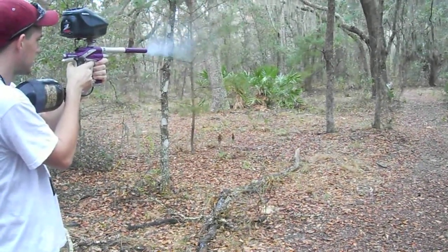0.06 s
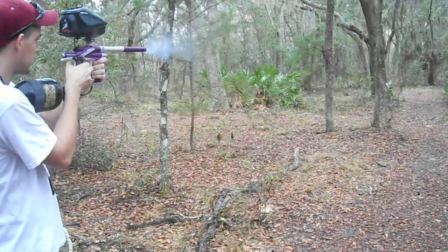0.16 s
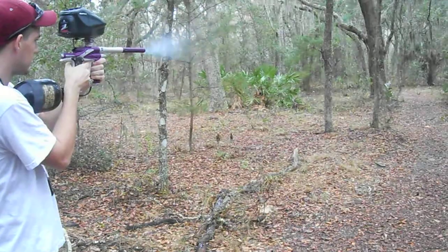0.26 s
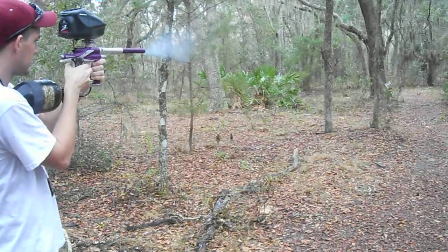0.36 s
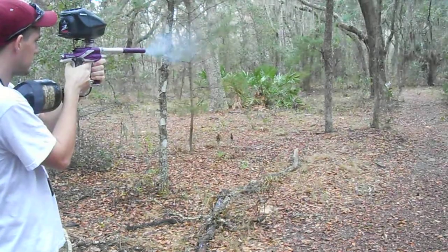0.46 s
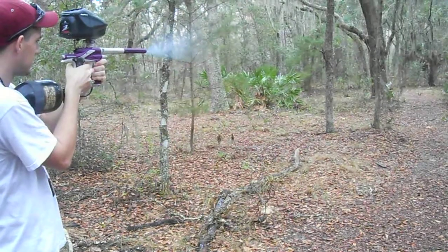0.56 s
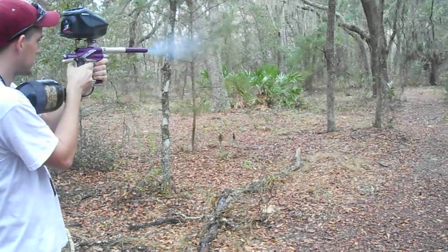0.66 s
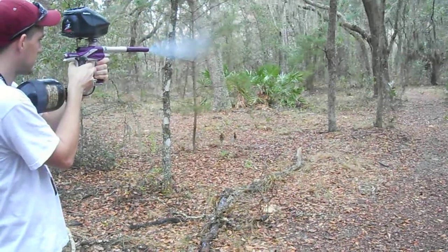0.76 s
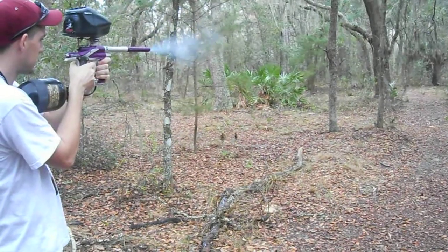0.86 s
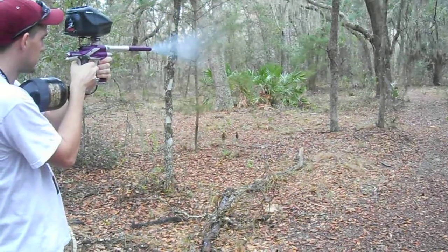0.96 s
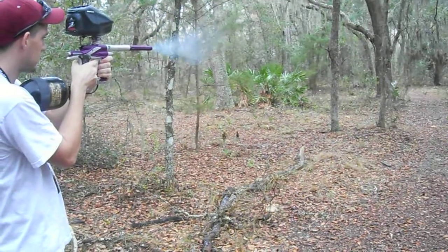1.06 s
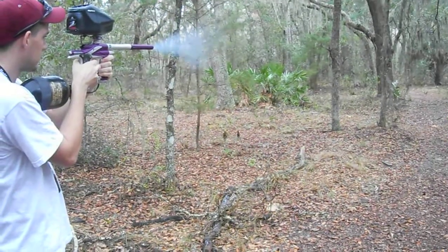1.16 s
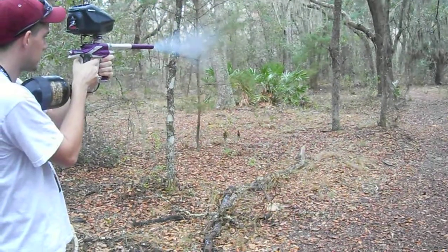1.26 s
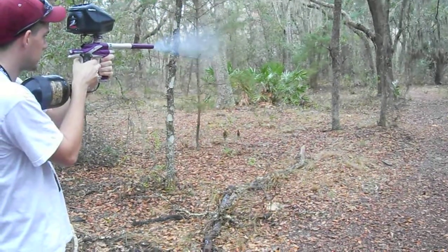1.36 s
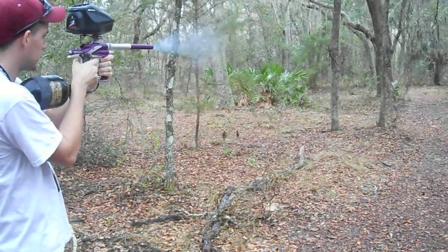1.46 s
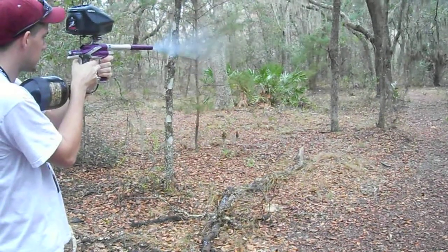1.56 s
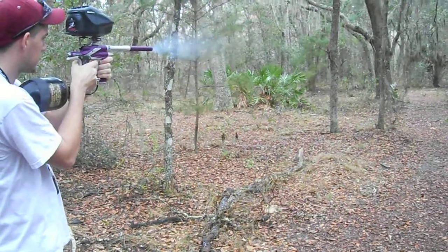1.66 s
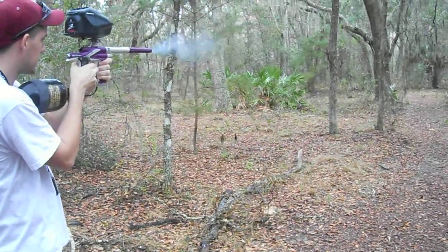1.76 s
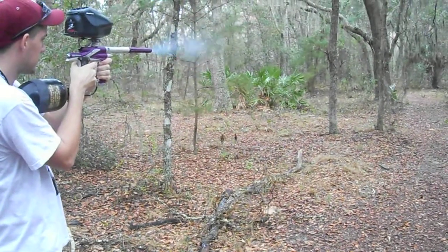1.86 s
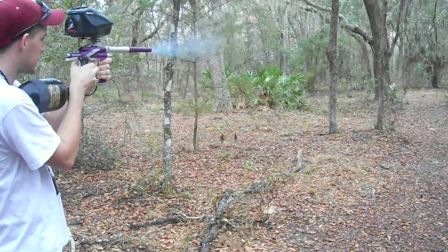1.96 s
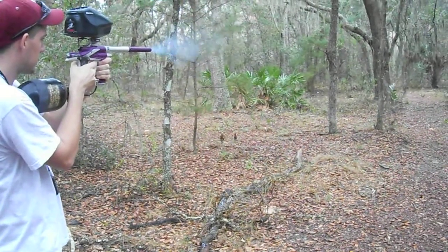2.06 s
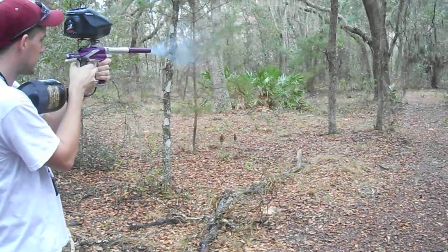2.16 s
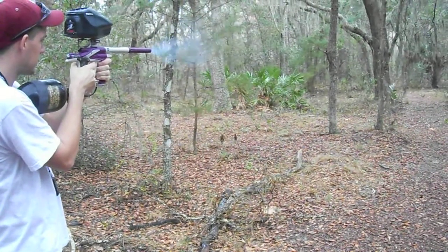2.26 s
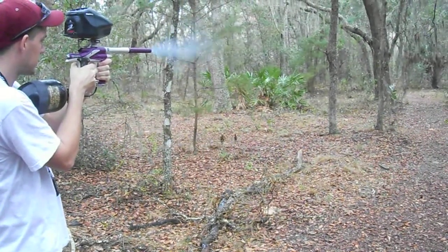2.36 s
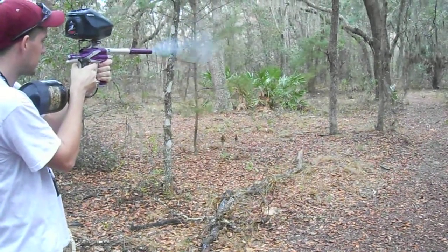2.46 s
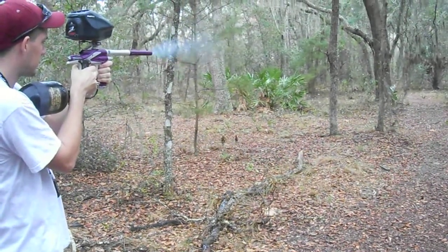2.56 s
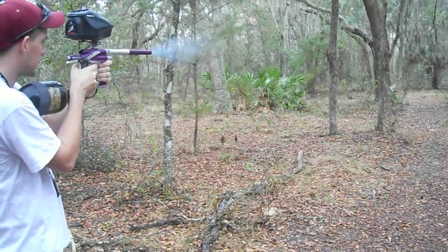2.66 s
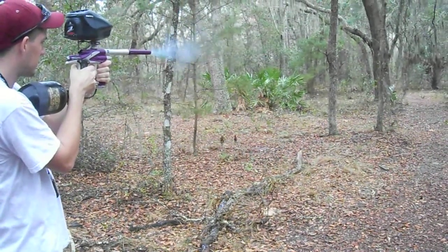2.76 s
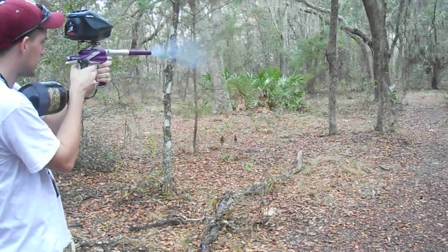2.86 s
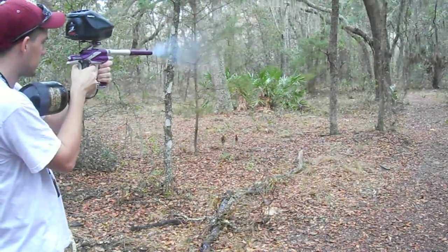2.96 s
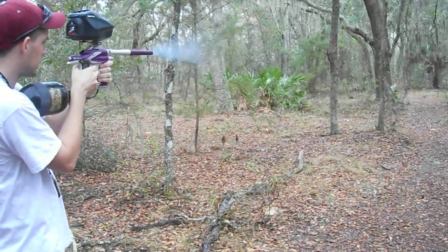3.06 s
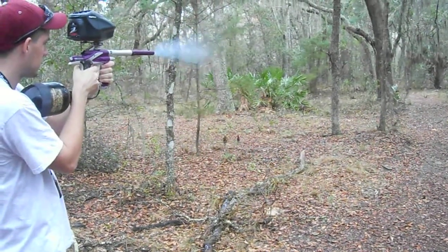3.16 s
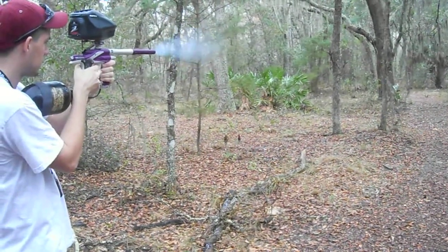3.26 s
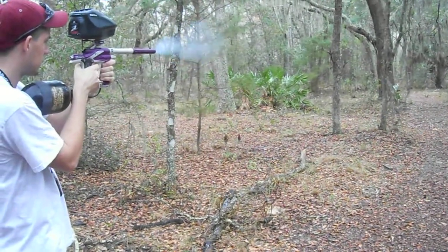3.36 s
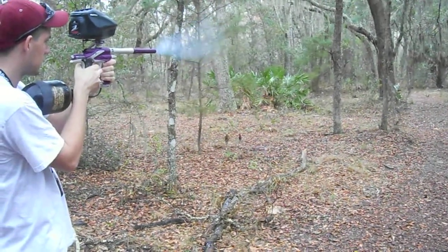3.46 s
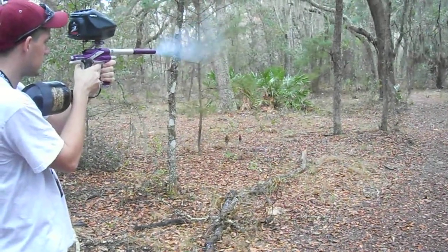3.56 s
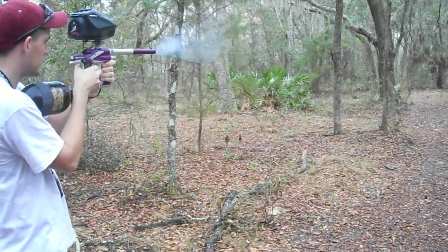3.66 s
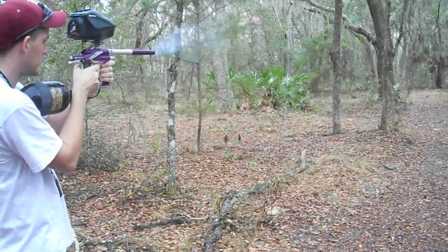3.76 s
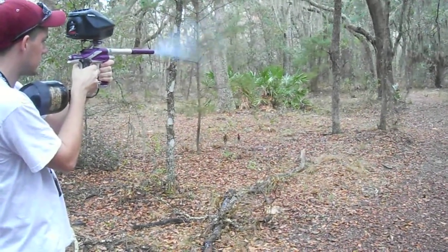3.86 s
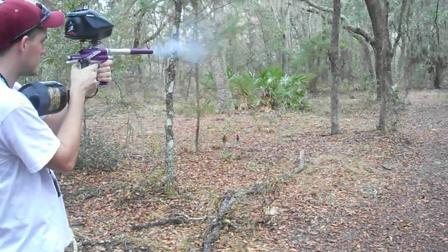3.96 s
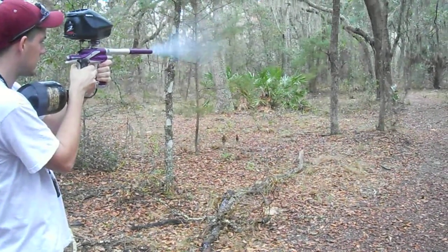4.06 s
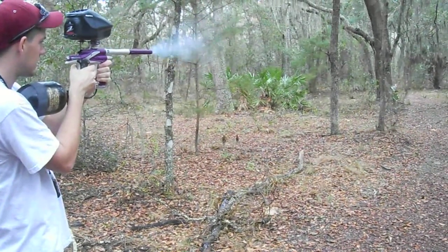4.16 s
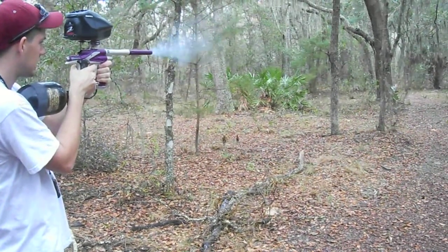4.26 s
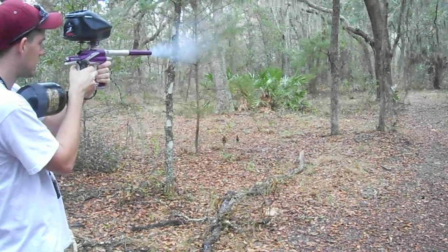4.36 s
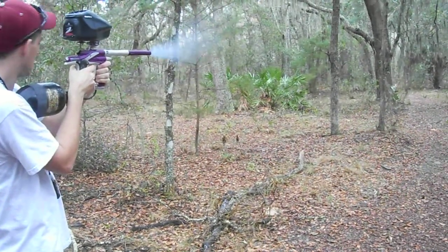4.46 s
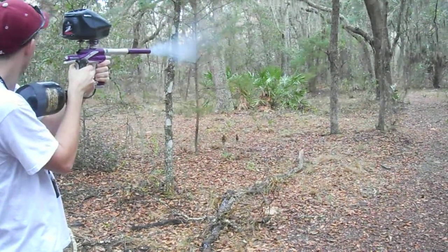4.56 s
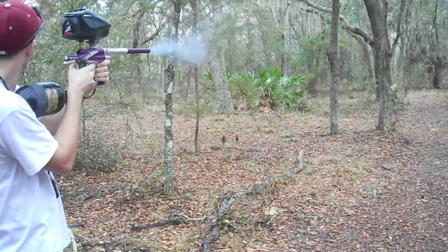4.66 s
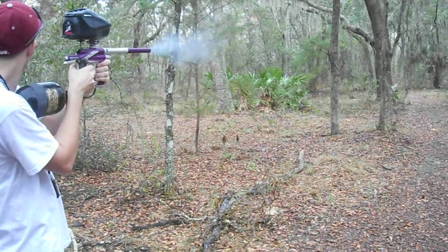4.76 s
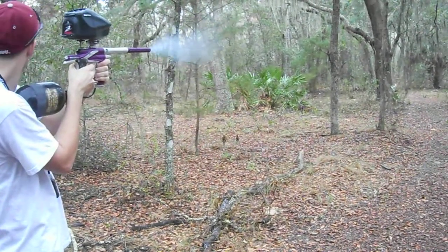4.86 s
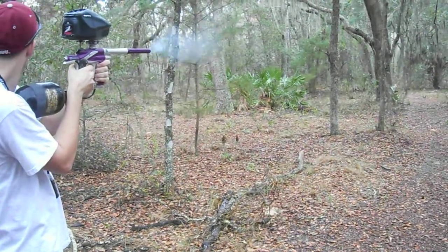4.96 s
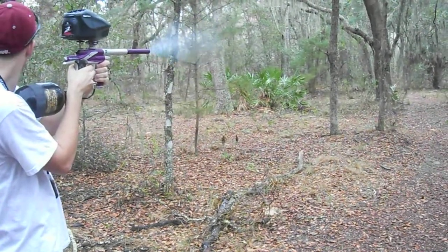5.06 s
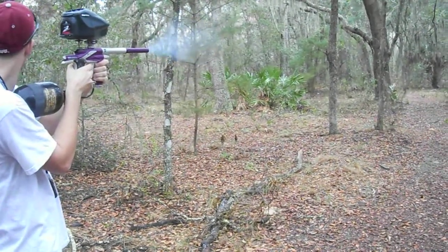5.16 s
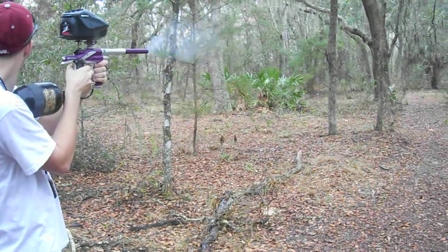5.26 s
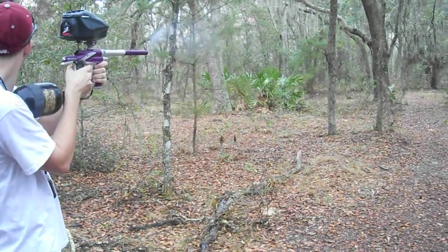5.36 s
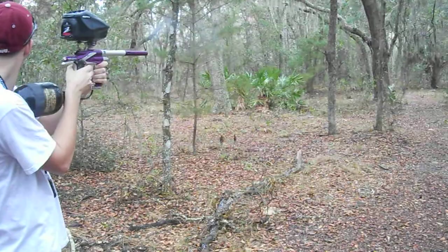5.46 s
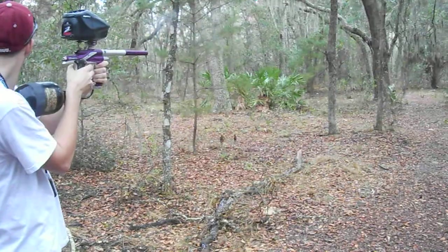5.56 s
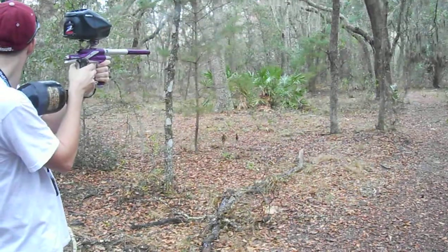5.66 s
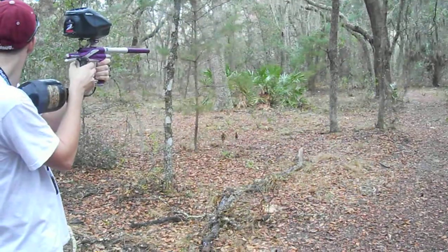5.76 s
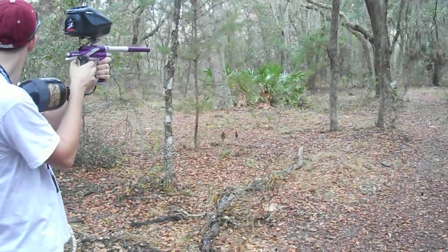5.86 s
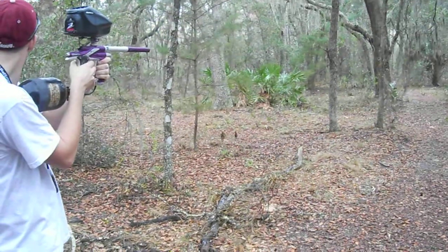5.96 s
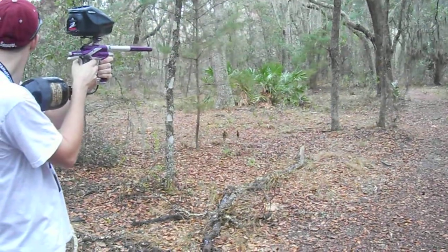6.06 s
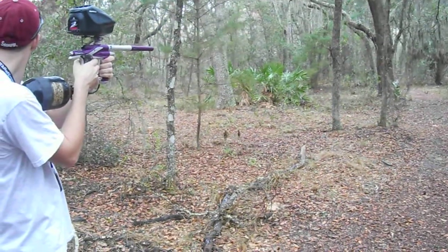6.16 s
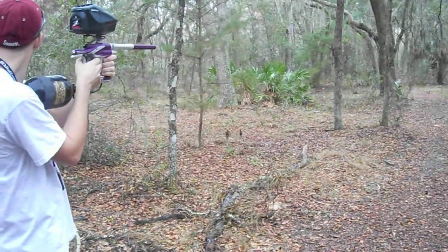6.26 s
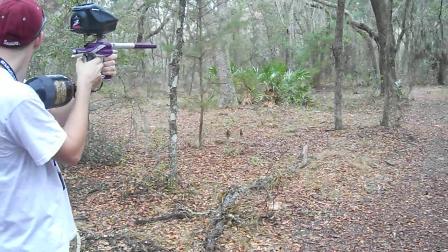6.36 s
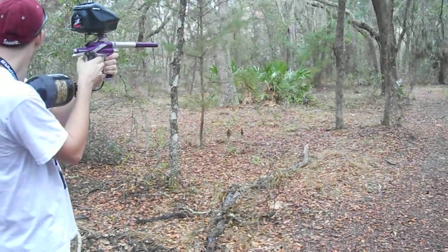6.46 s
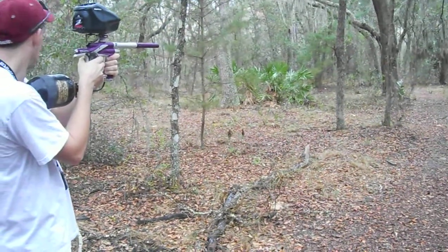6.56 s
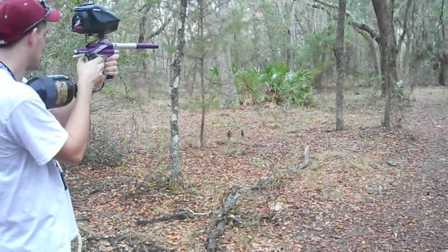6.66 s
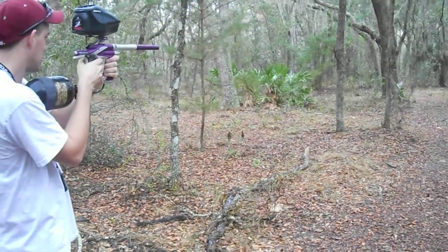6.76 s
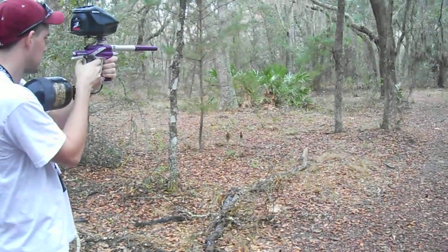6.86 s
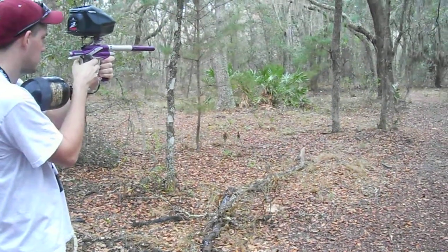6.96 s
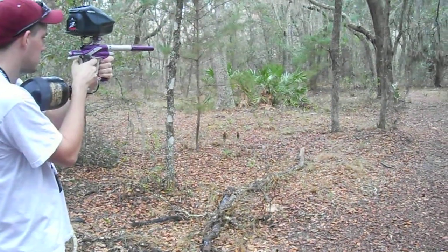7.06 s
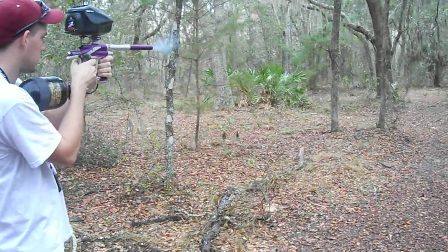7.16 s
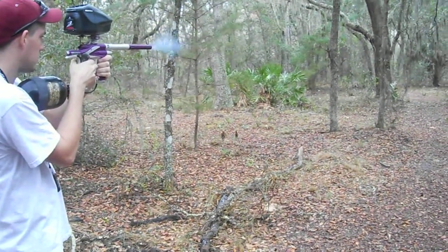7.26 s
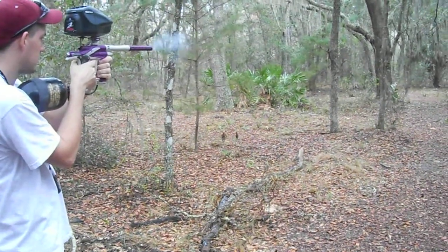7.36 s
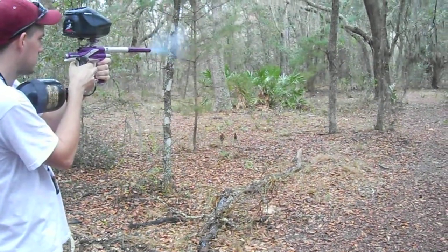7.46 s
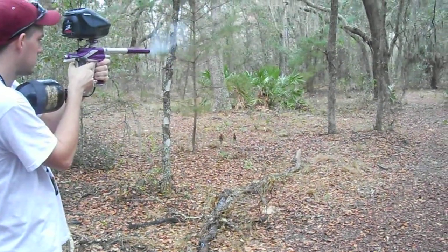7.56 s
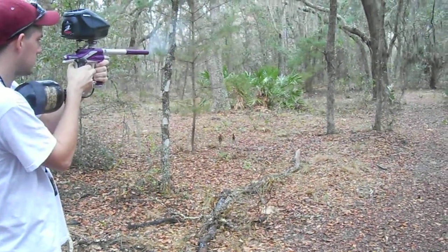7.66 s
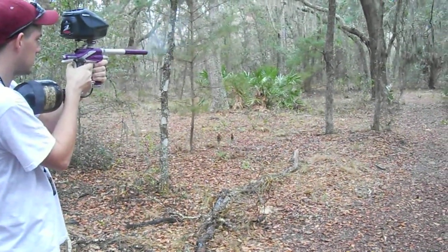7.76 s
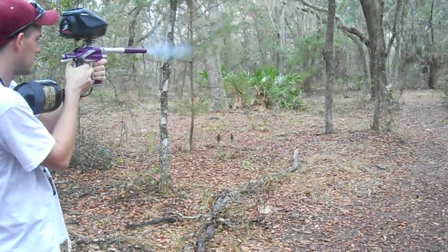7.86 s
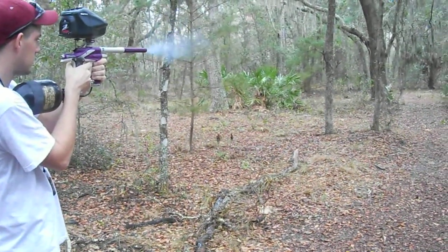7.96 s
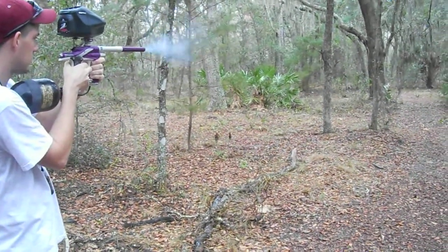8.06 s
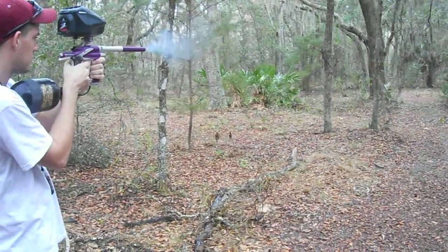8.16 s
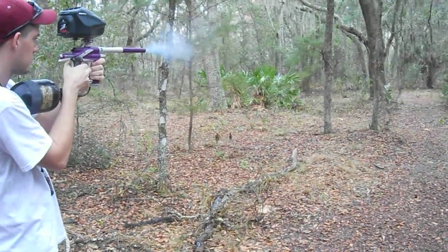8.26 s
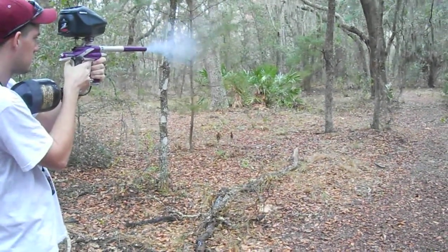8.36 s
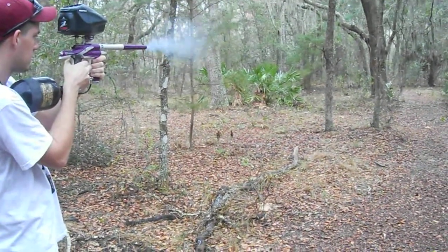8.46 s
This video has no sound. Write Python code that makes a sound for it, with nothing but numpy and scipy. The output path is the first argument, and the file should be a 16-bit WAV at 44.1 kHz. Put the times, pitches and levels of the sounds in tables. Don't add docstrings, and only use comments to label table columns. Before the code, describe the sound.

Rapid-fire compressed-air pops with metallic bolt clacks and hissing air, broken by short gaps and three spaced shots, echo briefly among trees.

```python
import sys
import numpy as np
from scipy import signal
from scipy.fft import rfft, irfft, next_fast_len
from scipy.io import wavfile
from scipy.ndimage import map_coordinates

SR = 44100
rng = np.random.default_rng(int(sys.argv[2]) if len(sys.argv) > 2 else 0)


def store_wav(level_fs):
    pcm = np.round(np.clip(np.atleast_2d(level_fs), -1, 1) * 32767)
    wavfile.write(sys.argv[1], SR, pcm.T.astype(np.int16))


def volts(x):
    e = np.asarray(x, float) / 20
    return 10 ** e


N = 375732


def unit(x):
    return x / np.sqrt(np.mean(x ** 2) + 1e-20)


def along(points, hz):
    f, v = np.transpose(points)
    return np.interp(np.log(hz + 1), np.log(f + 1), v)


def filtered(x, response):
    m = next_fast_len(len(x) + 4096)
    return irfft(rfft(x, m) * response(np.fft.rfftfreq(m, 1 / SR)), m)[:len(x)]


def modes(table):
    def response(f):
        total = 0
        for k, (centre, width, db) in enumerate(table):
            damping = 1j * f * width
            total = total + (-1) ** k * volts(db) * damping / (centre * centre - f * f + damping + 1)
        return total
    return response


def wobble(rate):
    return map_coordinates(rng.standard_normal(int(N * rate / SR) + 4), [np.arange(N) * rate / SR])


def noise(spectrum):
    return unit(filtered(rng.standard_normal(N), lambda f: volts(along(spectrum, f))))


def add(track, s, piece):
    at = round(s * SR)
    part, piece = track[max(at, 0):], piece[max(-at, 0):]
    part[:len(piece)] += piece[:len(part)]


def burst(t60, rise=.0002, length=.03):
    t = np.arange(round(length * SR)) / SR
    return rng.standard_normal(len(t)) * volts(-60 * t / t60) * (1 - np.exp(-t / rise))


def strike(t60, grit, length=.03):
    blow = grit * burst(t60, length=length)
    blow[0] += 1
    return blow


def overload(x, top, hardness):
    return x / (1 + np.abs(x / top) ** hardness) ** (1 / hardness)


# (time [s], shots, bolt delay of first shot [ms], bolt delay of later shots [ms])
STRINGS = [
    (-.44262, 36, 22, 25.2),
    (2.5157, 15, 22.4, 24.9),
    (3.7913, 14, 22.7, 25),
    (4.9841, 3, 21.6, 24.3),
    (7.0854, 1, 15.1, 0),
    (7.2371, 1, 18.7, 0),
    (7.4366, 1, 18.5, 0),
    (7.7616, 10, 17.9, 22.4),
]
START_DB = [-13.5, -14, -13, -15.1, -11.5, -12.6, -13, -14.3]
SAG_DB_PER_S = [0.43, 0.27, 2.7, .3, 0, 0, 0, 0]


def firing():
    cycle_s, first_early_s = .080537, .0002
    mean_tick_db, mean_bolt_db, mean_echo_db = -21.5, -0.8, -19.5
    scatter = [.55, .6, .55, .9, .45]
    rows = []
    for (start, shots, first_ms, later_ms), start_db, sag in zip(STRINGS, START_DB, SAG_DB_PER_S):
        k = np.arange(shots)
        pop_luck, tick, late, bolt, echo = (rng.standard_normal((shots, 5)) * scatter).T
        times = start + k * cycle_s - (k > 0) * first_early_s
        pop_db = start_db - sag * k * cycle_s + pop_luck
        bolt_ms = np.where(k > 0, later_ms + late, first_ms)
        rows += zip(times, pop_db, mean_tick_db + tick - pop_luck, bolt_ms,
                    mean_bolt_db + bolt - pop_luck, mean_echo_db + echo - pop_luck / 2)
    return np.array(rows)


# (frequency [Hz], width [Hz], level [dB])
VALVE = [(834, 84, 3.5), (2640, 530, -12.5), (3800, 1900, -19), (8040, 8800, -21)]


def valve_ticks(shots):
    valve, tick = np.zeros(N), strike(0.021, 1.0)
    for s, db, tick_db, *_ in shots:
        add(valve, s - .0112, volts(db + tick_db + 25) * (tick + 0.031 * burst(0.0098)))
    return filtered(valve, modes(VALVE))


# (delay [ms], level [dB], dulled above [Hz])
ARRIVALS = [
    (.27, 2, 2100),
    (1.45, 1.5, 3150),
    (2.0, -7, 21600),
    (2.9, -13.5, 13000),
    (4.65, 1, 2960),
    (5.3, 8.5, 940),
    (7.05, 1, 1220),
    (9.75, -2, 720),
    (10.5, 5, 1020),
    (12.9, -5, 750),
]
PUSH = [-1, -1, 1, 1, -1, 1, -1, -1, 1, -1]
# (frequency [Hz], width [Hz], level [dB])
BARREL = [(184, 1440, -2.65), (534, 87, -8.5), (867, 60, -13), (1516, 290, 0.5), (1705, 140, -28),
          (2434, 216, 1.5), (3390, 180, -5), (3780, 230, -6.5)]


def muzzle_pops(shots):
    def paths(f):
        total = 0
        for push, (ms, db, dull_hz) in zip(PUSH, ARRIVALS):
            delay = np.exp(-2j * np.pi * f * ms / 1000)
            total = total + push * volts(db) * delay / (1 + 1j * f / dull_hz) ** 2
        return total

    pops, barrel = np.zeros(N), modes(BARREL)
    impulse = np.eye(1, 1200)[0]
    front = unit(filtered(impulse, lambda f: paths(f) * barrel(f)))
    for s, db, *_ in shots:
        add(pops, s, volts(db - 5.5) * front)
    return pops


# (delay [ms], level [dB], t60 [ms])
JETS = [
    (.4, 3, 7.5),
    (2.3, -2, 8.5),
    (4.9, 1.5, 9.4),
    (9.8, -7, 8),
]
# (frequency [Hz], density [dB per Hz])
JET = [(900, -9.5), (1500, 5), (3000, -5.5), (4000, 1), (5500, -6), (7500, 0), (9000, 1.5), (11500, -5.5),
       (14000, 1.5)]


def air_jets(shots):
    jets = np.zeros(N)
    habit = [burst(t60_ms / 1000, rise=0.000092) for _, _, t60_ms in JETS]
    for s, db, *_ in shots:
        for (ms, jet_db, t60_ms), usual in zip(JETS, habit):
            level = volts(db + jet_db + rng.normal(0, 0.98) + 7.0)
            fresh = burst(t60_ms / 1000, rise=0.00031)
            add(jets, s + ms / 1000, level * (0.75 * usual + 0.97 * fresh))
    return filtered(jets, lambda f: volts(along([(200, -56)] + JET, f)))


# (frequency [Hz], width [Hz], level [dB])
BOLT = [(940, 167, 1), (2670, 150, -9), (4600, 1040, -13.5), (7290, 720, -2), (11100, 2600, -9)]


def bolt_slams(shots):
    bolt, slam = np.zeros(N), burst(0.0074, rise=0.00024)
    for s, db, _, late_ms, bolt_db, _ in shots:
        rattle = 1.45 * burst(0.0072, rise=0.00017)
        tail = volts(-18.0) * burst(0.079)
        add(bolt, s + late_ms / 1000, volts(db + bolt_db + 13.5) * (0.69 * slam + rattle + tail))
    return filtered(bolt, modes(BOLT))


# (frequency [Hz], t60 [s])
TREES = [(150, 0.41), (500, 0.31), (1000, 0.32), (3000, 0.32), (10000, 0.27)]
# (frequency [Hz], density [dB per Hz])
FOLIAGE = [(100, -46), (300, 0.5), (550, 2), (900, 0), (1600, -3.5), (3000, -15.5), (3700, -7.5),
           (4600, -13.5), (6000, -12.5), (9000, -11.5)]


def trees(shots):
    out = np.zeros(N)
    hz, t = np.fft.rfftfreq(256, 1 / SR)[:, None], np.arange(120) * 128 / SR

    def chance():
        return (rng.standard_normal((len(hz), len(t), 2)) @ [1, 1j]) / 18

    near = volts(-8.5 - 60 * t / 0.19)
    far = volts(-60 * t / along(TREES, hz))
    colour = volts(along(FOLIAGE, hz))
    steady, same = 1 / (1 + (hz / 2500) ** 2), chance()
    for s, db, *_, echo_db in shots:
        new = chance()
        nearest = steady * same + np.sqrt(1 - steady ** 2) * new
        field = (near * nearest + far * new) * colour
        add(out, s + .009, volts(db + echo_db + 15.5) * signal.istft(field, SR, nperseg=256)[1])
    return out


# (frequency [Hz], density [dB per Hz])
ROAD = [(120, -36), (200, -12.5), (369, -6), (409, -4.5), (448, -9.5), (482, -6), (641, -10), (717, -1),
        (1020, 0.5), (1370, -6), (2300, -21.5), (2990, -38), (5060, -120)]
# (frequency [Hz], density [dB per Hz])
RUMBLE = [(12, -33), (20, 10.5), (65, 5), (108, -4), (182, -7), (220, -31), (290, -32), (480, -120)]
# (frequency [Hz], density [dB per Hz])
HISS = [(1200, -46), (2200, 0), (4000, -1.5), (8000, -5), (12500, -4.5)]


def background():
    road_db, rumble_db, hiss_db = -53, -53.5, -64
    lumps = volts(.5 * wobble(9) + .7 * wobble(30))
    gusts = volts(1.2 * wobble(6))
    road = volts(road_db) * lumps * noise(ROAD)
    rumble = volts(rumble_db) * gusts * noise(RUMBLE)
    return road + rumble + volts(hiss_db) * noise(HISS + [(14000, -60)])


def deep_wood(shots):
    linger_t60, low_db, high_db = 3.4, -50.5, -56
    t = np.arange(0, N / SR + .01, .005)
    age = np.maximum(t[:, None] - shots[:, 0], 0)
    power = volts(-60 * age / linger_t60) ** 2 * (1 - np.exp(-age / 0.024))
    pile = np.sqrt(power.sum(axis=1))
    low = volts(low_db + 1.3 * wobble(16) + 0.99 * wobble(30)) * noise(ROAD)
    high = volts(high_db) * noise(HISS + [(14000, -60)])
    return np.interp(np.arange(N) / SR, t, pile) * (low + high)


# (time [s], peak level [dB], ring [Hz], top re ring [dB])
CLICKS = [(0.021, -27, 3800, 1), (0.09, -15, 3430, -2), (2.4724, -9.5, 4200, -7), (2.55, -10, 4070, -14),
          (2.6345, -11.5, 7280, -11), (3.5952, -23, 7550, -1), (3.7349, -9, 4240, -12),
          (3.821, -15, 4150, -6), (4.919, -14.5, 4240, -8), (5.098, -15, 4800, -9),
          (5.248, -7.5, 4600, -11), (5.318, -11.5, 3850, -7.5), (5.4018, -13.5, 3630, -3.5),
          (6.864, -28, 4920, -4), (7.3482, -14.5, 4570, -5.5), (7.49, -21, 4600, -1), (7.69, -16, 3850, -1)]
# (time [s], peak level [dB], ring [Hz])
FEED = [(.6156, -17, 4400), (.702, -15, 4300), (0.781, -16, 4100), (.862, -16, 3000), (1.024, -13, 4000),
        (1.2594, -9.5, 4600), (1.826, -12, 3570), (2.1501, -17, 4500), (2.232, -13, 4100), (2.39, -8, 4400),
        (2.7745, -18, 4200), (2.9312, -14, 3600), (3.1754, -11, 3620), (3.2554, -14, 3450),
        (3.5826, -21, 4700), (4.205, -9, 4500), (4.6138, -15, 3920), (4.6933, -12, 4100), (8.173, -8, 4340)]


def clicks():
    out = np.zeros(N)
    feed_top_db = -3
    for s, db, hz, top_db in CLICKS + [(*row, feed_top_db) for row in FEED]:
        echo = volts(-36) * burst(0.22, rise=0.0021, length=.12)
        blow = strike(0.0065, 0.25, length=.12) + echo
        ring = modes([(hz * 0.857, 800, -2), (hz * 1.104, 800, -2)])
        body, top = modes([(1100, 1100, -0.89)]), modes([(8300, 5500, top_db)])
        around = modes([(hz * 1.15, hz * 1.1, 0)])
        plastic = filtered(blow, lambda f: (body(f) + ring(f) - top(f)) * around(f))
        add(out, s, volts(db + 15.5) * plastic)
    return out


# (time [s], peak level [dB], ring [Hz], upper ring re main [dB])
KNOCKS = [
    (5.617, -26, 460, -18),
    (6.006, -17, 760, -26),
    (6.175, -16, 950, -7),
    (6.749, -35, 692, -14),
]


def knocks():
    out = np.zeros(N)
    for s, db, hz, top_db in KNOCKS:
        wood = modes([(hz, 300, 0), (2600, 300, top_db)])
        dull = filtered(strike(0.028, 0.16), lambda f: wood(f) / (1 + 1j * f / 1500) ** 2)
        add(out, s, volts(db + 29.0) * dull)
    return out


def gain_control(shots):
    open_db, ease = 18, 1.71
    recover_s, clamp_s = 0.58, 0.0092
    lock_s = 0.67
    s, t = shots[:, 0], np.arange(N) / SR

    def opened(rest):
        return open_db * (1 - np.exp(-(np.maximum(rest, 0) / recover_s) ** ease))

    held = lock_s * (opened(np.diff(s, prepend=s[0])) / open_db) ** 2
    free = np.maximum.accumulate(s + held)
    met_db = opened(s - np.r_[s[0], free[:-1]])
    last = np.searchsorted(s, t) - 1
    return volts(opened(t - free[last]) + met_db[last] * np.exp(-(t - s[last]) / clamp_s))


def scene():
    shots = firing()
    blast = valve_ticks(shots) + muzzle_pops(shots) + air_jets(shots) + bolt_slams(shots)
    blast = overload(blast, 0.54, 4)
    gained = gain_control(shots) * (blast + trees(shots) + background())
    return (gained + deep_wood(shots) + clicks() + knocks())[None]


def roll_off(x):
    return signal.sosfilt(signal.butter(12, 16430, fs=SR, output="sos"), x)


# (frequency [Hz], level [dB])
MICROPHONE = [(20, -11), (100, 0), (10050, 0), (10900, -15), (11900, -22), (12700, -52), (20000, -95)]


def record(dry):
    kept = filtered(overload(dry[0], .66, 6), lambda f: volts(along(MICROPHONE, f)))
    excess = dry[0] - dry[0].clip(-1.2, 1.2)
    spill_band = [(10500, -70), (12000, -24), (16000, -26), (16800, -80)]  # Hz, dB
    spill = filtered(excess, lambda f: volts(along(spill_band, f)))
    return roll_off((kept + spill)[None])


dry = scene()
out = record(dry)
store_wav(out)
```